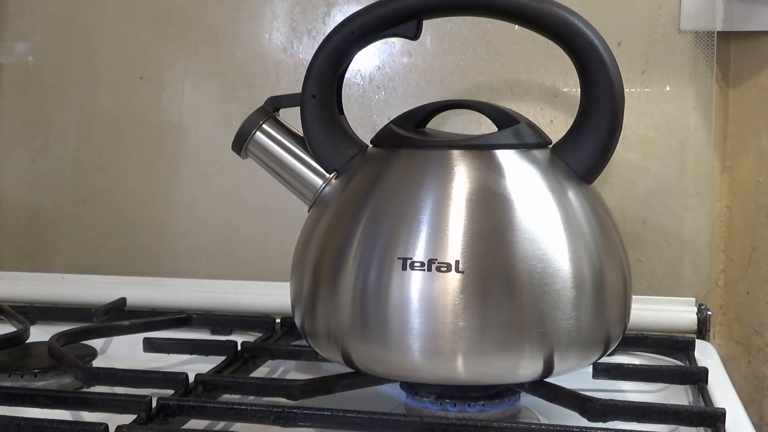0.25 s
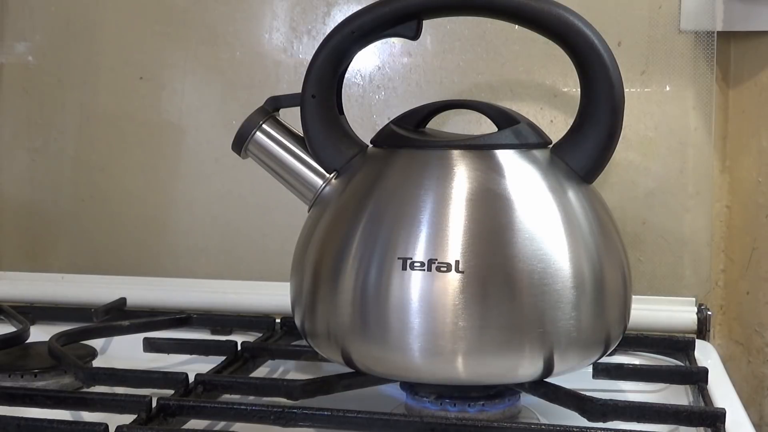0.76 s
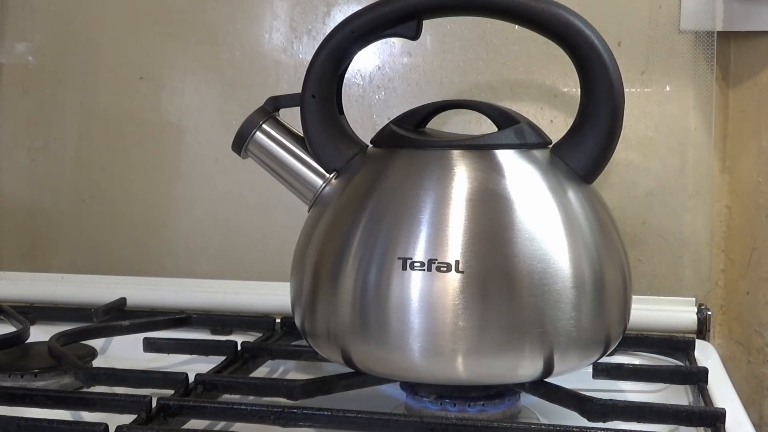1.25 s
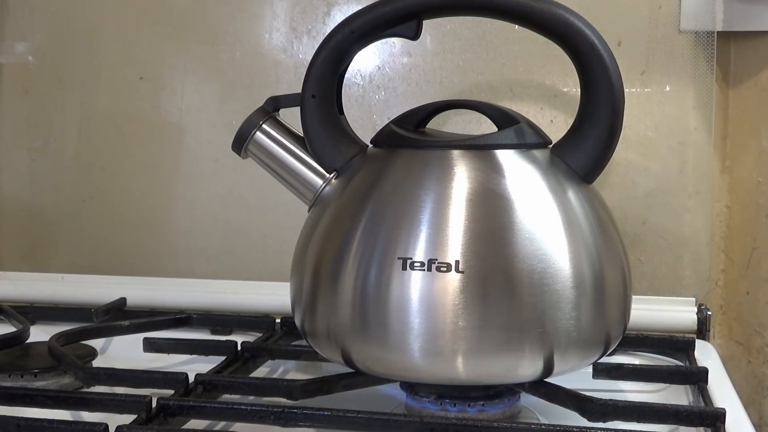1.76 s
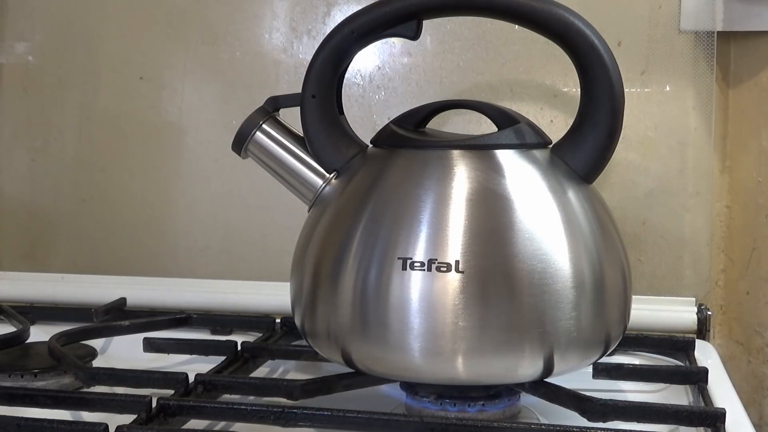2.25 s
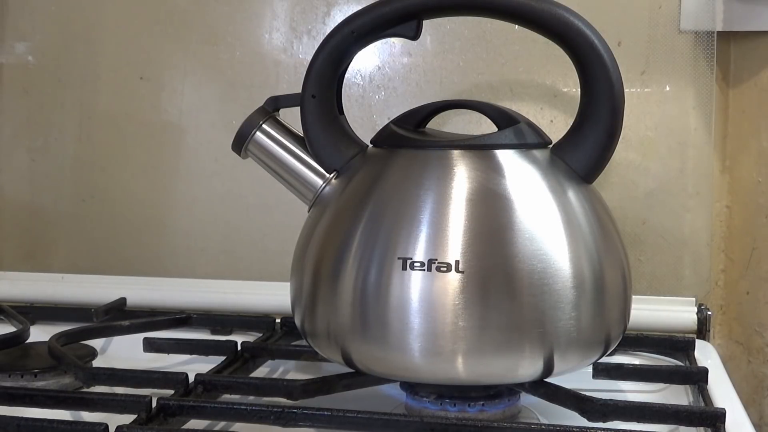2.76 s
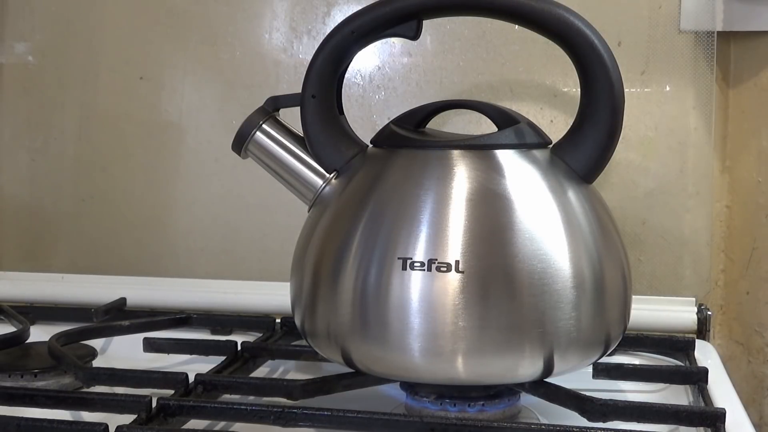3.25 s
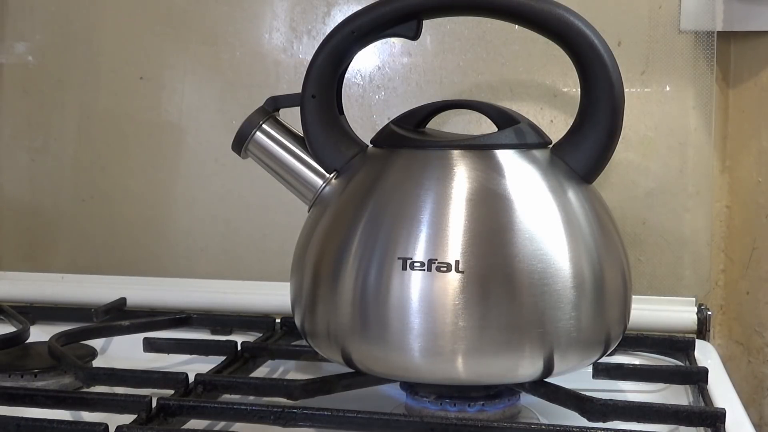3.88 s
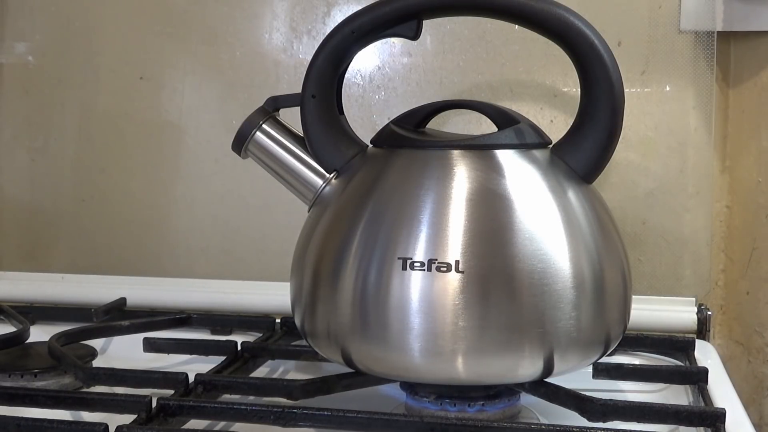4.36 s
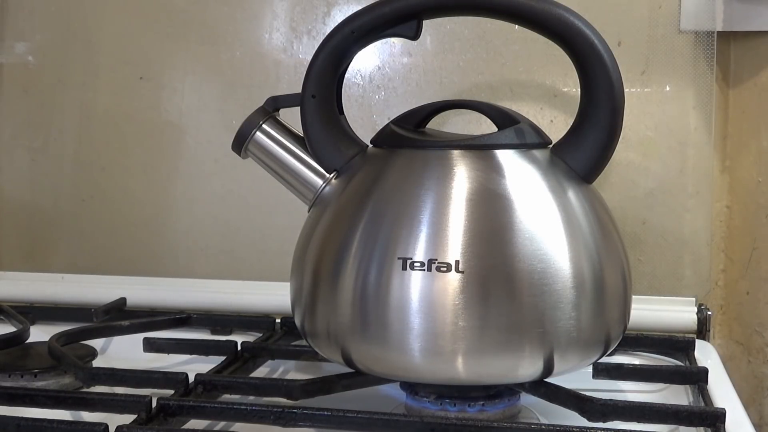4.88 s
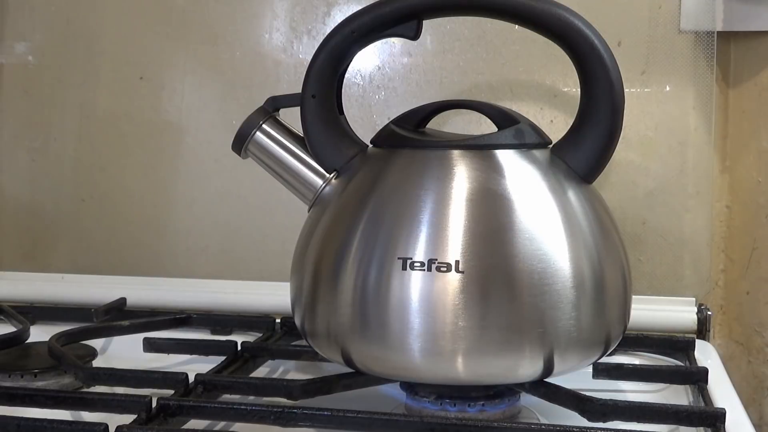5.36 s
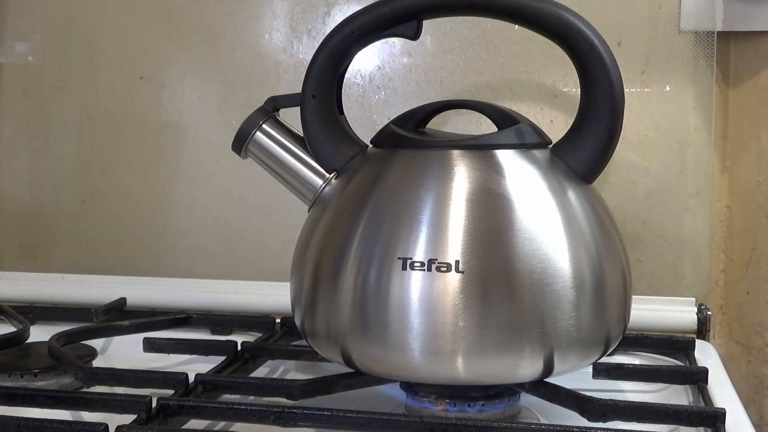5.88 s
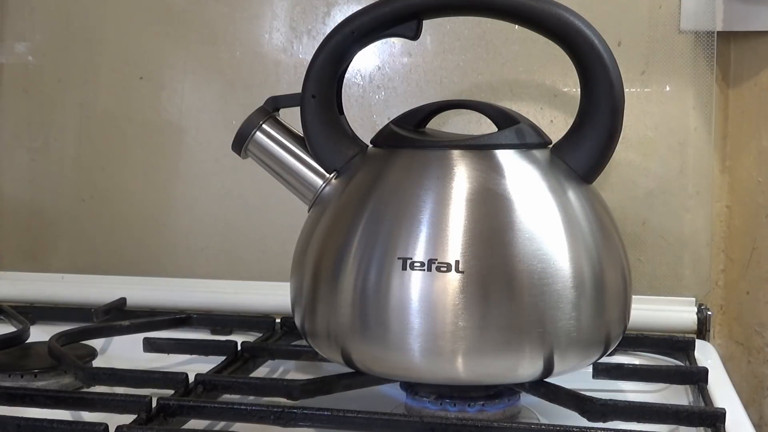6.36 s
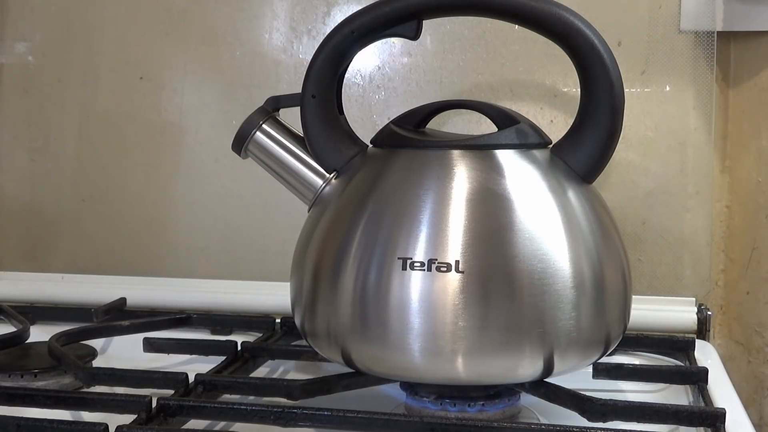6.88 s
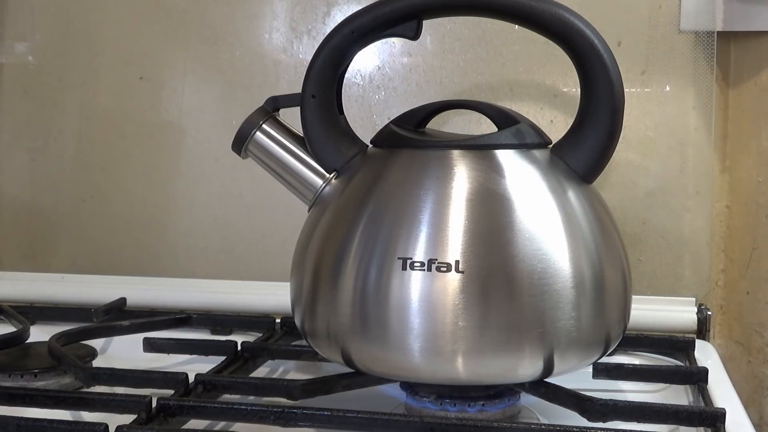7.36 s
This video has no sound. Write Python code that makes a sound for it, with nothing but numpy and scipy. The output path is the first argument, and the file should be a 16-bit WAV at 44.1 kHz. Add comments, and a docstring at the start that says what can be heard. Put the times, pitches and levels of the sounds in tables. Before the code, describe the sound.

Continuous shrill kettle whistle, heard close up in a small reflective kitchen. The tone is bright and slightly rough, fluttering with the bubbling steam, its loudness swelling and dipping as the pitch wavers. Airy hiss and fine sizzle surround it, and a few brief droplets make it stutter. A soft low boil and gas flame rumble stays far underneath; the whistle is still sounding at the end.

```python
"""A small kitchen: a steel kettle boils on a gas ring. Steam drives the whistle in its spout:
sine partials whose pitch follows the unsteady pressure, so each swells and fades against its echoes.
The jet hisses and the spout spits now and then: coloured, resonated noise.
Flame and boiling water rumble softly below: low noise through narrow resonances, over a faint hum."""
import sys
import numpy as np
from scipy import signal
from scipy.fft import rfft, irfft
from scipy.io import wavfile

SR = 44100
rng = np.random.default_rng(int(sys.argv[2]) if len(sys.argv) > 2 else 0)


def materialize(psi):
    """Save the field psi as 16-bit PCM at rate SR to the path in sys.argv[1].

    A 1-D psi becomes a single channel; in a 2-D psi each row is a channel.
    """
    bounded = np.clip(np.atleast_2d(psi).T, -1, 1)
    quanta = np.round(bounded * 32767).astype(np.int16)
    wavfile.write(sys.argv[1], SR, quanta)


N = 336483
TIME = np.arange(N) / SR


def from_db(db):
    """Decibels to amplitude gain."""
    return 10 ** (np.asarray(db) / 20)


def rms_one(x):
    """Scale to an rms of 1."""
    return x / np.sqrt(np.mean(x ** 2) + 1e-20)


def swell(t_s, half_s):
    """Gaussian pulse of height 1."""
    return np.exp(-.5 * ((TIME - t_s) / half_s) ** 2)


def pulses(rows):
    """Sum of Gaussian pulses from rows of time, height, half length."""
    return sum(height * swell(t_s, half_s) for t_s, height, half_s in rows)


def drift(rate_per_s):
    """Low-passed chance with about this many changes a second; rms 1."""
    r = np.exp(-2 * np.pi * rate_per_s / SR)
    noise = rng.standard_normal(N + SR)
    # the first second lets the filter settle
    return rms_one(signal.lfilter([1], [1, -2 * r, r * r], noise)[SR:])


def resonate(x, hz, width_hz):
    """Two-pole resonance with a peak gain of 1."""
    r = np.exp(-np.pi * width_hz / SR)
    numerator = np.array([1, 0, -1]) * (1 - r * r) / 2
    return signal.lfilter(numerator, [1, -2 * r * np.cos(2 * np.pi * hz / SR), r * r], x)


# underlying course of the whistle's pitch, set by steam pressure: [t/s, f/Hz]
STEAM_PITCH = [(0.0, 1859), (0.29, 1828), (0.89, 1895), (0.94, 1965), (1.09, 1857), (1.74, 1913),
               (2.24, 1796), (2.38, 1878), (2.47, 1822), (2.65, 1860), (2.76, 1802), (2.86, 1859),
               (3.01, 1805), (3.08, 1861), (3.41, 1851), (3.52, 1903), (3.76, 1952), (3.88, 1910),
               (3.93, 1963), (4.48, 1879), (4.86, 1914), (5.08, 1978), (5.15, 1897), (5.28, 1921),
               (5.37, 1852), (5.74, 1949), (5.9, 1884), (6.0, 1949), (6.2, 1846), (6.35, 1923), (6.6, 1920),
               (6.71, 1995), (7.17, 1857), (7.26, 1950), (7.34, 1865), (7.62, 1908)]


def steam_pitch():
    """Pitch in Hz that the slow rise and sag of the steam pressure calls for."""
    t_s, hz = np.transpose(STEAM_PITCH)
    return np.interp(TIME, t_s, hz)


USUAL_PITCH_HZ = 1890


def steam_pressure():
    """Pressure above the usual, counted in hundreds of Hz of pitch."""
    return (steam_pitch() - USUAL_PITCH_HZ) / 100


# brief surges and sags of pressure: [t/s, pitch change/Hz, half length/s]
PRESSURE_SURGES = [(.97, 40, .009), (1.529, -55, .005), (1.541, 145, .008), (1.751, 85, .006),
                   (4.473, -70, .003), (6.116, -60, .003), (6.622, 60, .003)]
# bubble wobble: rms depth at the usual pitch, centre and spread of rate, loss per 100 Hz of pitch
WOBBLE_HZ, WOBBLE_PER_S, WOBBLE_SPREAD_PER_S, WOBBLE_CALM_DB = 16, 11, 18, 1.5
JITTER_HZ, JITTER_PER_S = 6.5, 400
LOWEST_HZ = 1790  # floor held by the cap, before jitter


def whistle_pitch():
    """Pitch follows pressure: bursting bubbles shake it, turbulence in the jet roughens it."""
    bubbling = rms_one(resonate(drift(122), WOBBLE_PER_S, WOBBLE_SPREAD_PER_S))
    # shaking calms as the pressure rises
    wobble = WOBBLE_HZ * from_db(-WOBBLE_CALM_DB * steam_pressure()) * bubbling
    pitch = steam_pitch() + pulses(PRESSURE_SURGES) + wobble
    return np.maximum(pitch, LOWEST_HZ) + JITTER_HZ * drift(JITTER_PER_S)


KITCHEN_T60_S = 0.53


def reverberation(x):
    """Dense reflections decay exponentially in the kitchen; tail of unit energy."""
    t = TIME[:SR // 2]
    tail = rng.standard_normal(len(t)) * from_db(-60 * t / KITCHEN_T60_S) * (t > .004)
    return signal.fftconvolve(x, tail / np.sqrt(np.sum(tail ** 2)))[:N]


WALL_DELAY_S, CORNER_DELAY_S, HOB_DELAY_S = .01356, .0094, .00396


def in_kitchen(tone, wall_gain, corner_gain, hob_gain, room_db, side_db):
    """Near echoes add to the tone or cancel it, so its level moves with its pitch."""
    paths = [(WALL_DELAY_S, wall_gain), (CORNER_DELAY_S, corner_gain), (HOB_DELAY_S, hob_gain)]
    echoes = sum(gain * np.interp(TIME - delay_s, TIME, tone, left=0) for delay_s, gain in paths)
    room = from_db(room_db) * reverberation(tone)
    # opposite signs left and right widen the note
    side = from_db(side_db) * reverberation(tone)
    return tone + echoes + room + side * [[1], [-1]]


def placed(x, left_db):
    """Louder by `left_db` on the left than on the right."""
    return x * from_db([[left_db / 2], [-left_db / 2]])


# fundamental: level at the usual pitch, gain per 100 Hz of pitch, flicker rms and rate
FIRST_DB, FIRST_GROWTH_DB, FIRST_FLICKER_DB, FIRST_FLICKER_PER_S = -20.5, 3.5, 1.37, 58


def fundamental(phase, pressure):
    """Vortex-shedding tone that grows with pressure."""
    flicker_db = FIRST_FLICKER_DB * drift(FIRST_FLICKER_PER_S)
    return from_db(FIRST_DB + FIRST_GROWTH_DB * pressure + flicker_db) * np.sin(phase)


OCTAVE_DB, OCTAVE_FULL_HZ, OCTAVE_FADE_DB_PER_HZ = -12.5, 1858, 0.15
# flicker rms is at half the greatest loss
OCTAVE_MAX_LOSS_DB, OCTAVE_FLICKER_DB, OCTAVE_FLICKER_PER_S = 5, 1.02, 40


def strong_octave(phase, pitch):
    """Second partial: full above a certain pitch, fading and faltering below it."""
    loss_db = np.clip(OCTAVE_FADE_DB_PER_HZ * (OCTAVE_FULL_HZ - pitch), 0, OCTAVE_MAX_LOSS_DB)
    falter_depth_db = OCTAVE_FLICKER_DB * (0.5 + loss_db / OCTAVE_MAX_LOSS_DB)
    falter_db = falter_depth_db * drift(OCTAVE_FLICKER_PER_S)
    return from_db(OCTAVE_DB - loss_db + falter_db) * np.sin(2 * phase)


UPPER_DB, UPPER_FLICKER_DB, UPPER_FLICKER_PER_S = -25.5, 1.38, 10.4
CAP_HZ, CAP_HALF_WIDTH_HZ, CAP_LIFT_DB = 11170, 80, 7.5
# upper partials, levels relative to UPPER_DB: [multiple, level/dB, gain per 100 Hz of pitch/dB]
UPPER_PARTIALS = [(3, -0.57, 0), (4, -3, -1.5), (5, -8, 1), (6, -15, 2), (7, -18, 4), (8, -26, 1)]


def upper_overtones(phase, pitch, pressure):
    """A harder jet reshapes the wave; a cap resonance lifts any partial passing through it."""
    upper = 0
    for k, level_db, growth_db in UPPER_PARTIALS:
        lift_db = CAP_LIFT_DB * np.exp(-.5 * ((k * pitch - CAP_HZ) / CAP_HALF_WIDTH_HZ) ** 2)
        upper = upper + from_db(level_db + growth_db * pressure + lift_db) * np.sin(k * phase)
    return upper * from_db(UPPER_DB + UPPER_FLICKER_DB * drift(UPPER_FLICKER_PER_S))


# droplets choke the whistle for an instant: [t/s, level change/dB, half length/s]
DROPLET_CHOKES = [(1.292, -5.5, 0.0052), (4.468, -2.5, 0.0058), (5.469, -4, 0.0018), (5.539, -30, 0.0012),
                  (6.114, -7, 0.0021)]


def whistle():
    """Vortices shed between the two plates of the spout cap sound a note with a strong octave."""
    pitch, pressure = whistle_pitch(), steam_pressure()
    phase = 2 * np.pi * np.cumsum(pitch) / SR
    flow = from_db(.5 * drift(138) + pulses(DROPLET_CHOKES))
    first = in_kitchen(flow * fundamental(phase, pressure),
                       wall_gain=.54, corner_gain=.25, hob_gain=.08, room_db=-12, side_db=-21)
    octave = in_kitchen(flow * strong_octave(phase, pitch),
                        wall_gain=.055, corner_gain=.09, hob_gain=.0067, room_db=-11, side_db=-26.5)
    upper = in_kitchen(flow * upper_overtones(phase, pitch, pressure),
                       wall_gain=.13, corner_gain=.23, hob_gain=.24, room_db=-3.5, side_db=-17)
    return placed(first, left_db=1.44) + placed(octave, left_db=-0.8) + placed(upper, left_db=-0.45)


def at_hz(points, hz):
    """Read a spectrum on a log-frequency axis."""
    known_hz, values = np.transpose(points)
    return np.interp(np.log(hz + 1e-9), np.log(known_hz), values)


# left-right correlation of the noises: [f/Hz, correlation/1]
EAR_LIKENESS = [(50, .85), (300, 0.87), (600, 0.92), (1500, 1), (7000, 1), (14000, 0.73)]


def stereo_noise(spectrum):
    """Coloured noise, mostly alike in both ears; rms 1."""
    hz = np.arange(N // 2 + 1) * SR / N
    alike = np.clip(at_hz(EAR_LIKENESS, hz), 0, 1)
    mid, side = rfft(rng.standard_normal((2, N))) * from_db(at_hz(spectrum, hz))
    both = np.sqrt(1 + alike) * mid + np.sqrt(1 - alike) * side * [[1], [-1]]
    return rms_one(irfft(both, N))


# colour of the steam hiss, relative density: [f/Hz, level/dB]
HISS_COLOUR = [(500, -24), (1000, -12.5), (1500, -9), (2200, -2.5), (2700, -12), (3300, -24.5), (4200, 3),
               (4700, -7.5), (6200, 0.5), (7000, 2.5), (8400, 1), (10300, -2.5), (12500, -9.5),
               (15500, -13)]
# fine sizzle of the fast jet, relative density: [f/Hz, level/dB]
SIZZLE_COLOUR = [(5000, -39), (9000, 7), (12000, -2), (14500, 6), (15700, -1)]
# spout resonances excited by the jet, relative to the hiss: [f/Hz, width/Hz, level/dB]
SPOUT_RESONANCES = [(3017, 55, -21), (5106, 250, -7.5), (7040, 60, -7)]
# spits of wet steam, before turbulence: [t/s, level/dB, half length/s]
SPOUT_SPITS = [(3.1, -47, 0.012), (3.314, -31, 0.019), (4.482, -46, 0.038), (5.884, -40, 0.016),
               (7.066, -36, 0.02)]


def steam():
    """The jet hisses, coloured by the spout; wet steam makes it spit."""
    pressure = steam_pressure()
    rush = stereo_noise([(1000, 0), (16000, 0)])
    spout = sum(from_db(level_db) * rms_one(resonate(rush, hz, width_hz))
                for hz, width_hz, level_db in SPOUT_RESONANCES)
    spit_gain = sum(from_db(level_db) * swell(t_s, half_s) for t_s, level_db, half_s in SPOUT_SPITS)
    spits = spit_gain * rms_one(spout)
    # under pressure more of the jet goes into the note: hiss thins, sizzle grows
    hiss = from_db(-35.5 - 2.1 * pressure) * (stereo_noise(HISS_COLOUR) + spout)
    sizzle = from_db(-44.0 + 3.0 * pressure) * stereo_noise(SIZZLE_COLOUR)
    turbulence = from_db(.9 * drift(60))
    return turbulence * (hiss + spits + sizzle)


BOIL_DB = -49.5  # roar at the usual pressure
HEAVE_T_S, HEAVE_RISE_DB, HEAVE_HALF_S = 2.92, 5.5, 0.036  # one heavier heave of the water
HUM_HZ, HUM_DB = 98.5, -64.5
# colour of flame and boiling water, relative density: [f/Hz, level/dB]
RUMBLE_COLOUR = [(20, -36), (30, -14), (42, -10), (90, -9), (110, -6), (160, -5), (200, -1), (290, -2.5),
                 (400, -6), (600, -8), (700, -8), (1400, -9), (1900, -47), (3000, -70)]
# low resonances of kettle and kitchen, relative to the roar: [f/Hz, width/Hz, level/dB]
HOLLOW_RESONANCES = [(183.8, 16, -10.5), (234.4, 3.2, -18), (298.5, 7, -16), (463, 26, -10),
                     (546.6, 8.9, -12.5), (606.5, 5.4, -13)]


def stove():
    """Flame and rolling water rumble through a few low resonances, over a faint mains hum."""
    roar = stereo_noise(RUMBLE_COLOUR)
    ringing = sum(from_db(level_db) * rms_one(resonate(stereo_noise(RUMBLE_COLOUR), hz, width_hz))
                  for hz, width_hz, level_db in HOLLOW_RESONANCES)
    hum = from_db(HUM_DB) * rms_one(np.sin(2 * np.pi * HUM_HZ * TIME))
    heave_db = HEAVE_RISE_DB * swell(HEAVE_T_S, HEAVE_HALF_S)
    # louder while the whistle sags
    level_db = BOIL_DB + heave_db - 1.9 * steam_pressure() + .5 * drift(8.1)
    return from_db(level_db) * (roar + ringing) + hum


def scene():
    """Sum of whistle, steam and stove."""
    return whistle() + steam() + stove()


CUTOFF_HZ = 15750


def record(dry):
    """Steep zero-phase elliptic low-pass."""
    low_pass = signal.ellip(12, .05, 60, CUTOFF_HZ, fs=SR, output="sos")
    return signal.sosfiltfilt(low_pass, dry)


dry = scene()
out = record(dry)
materialize(out)
```